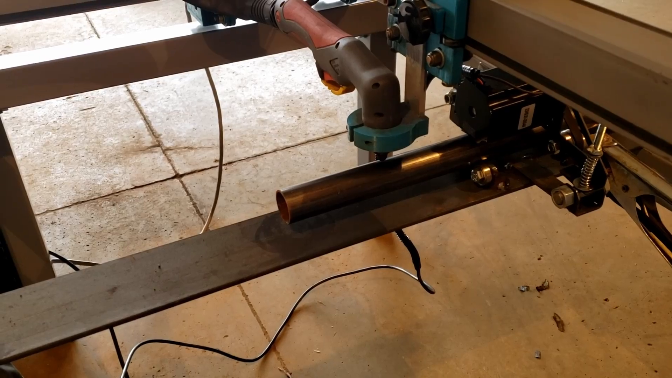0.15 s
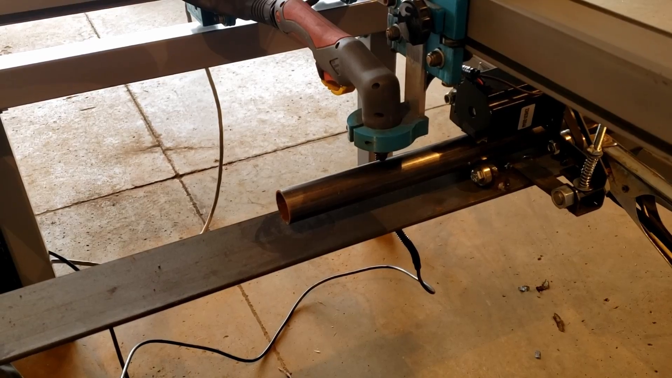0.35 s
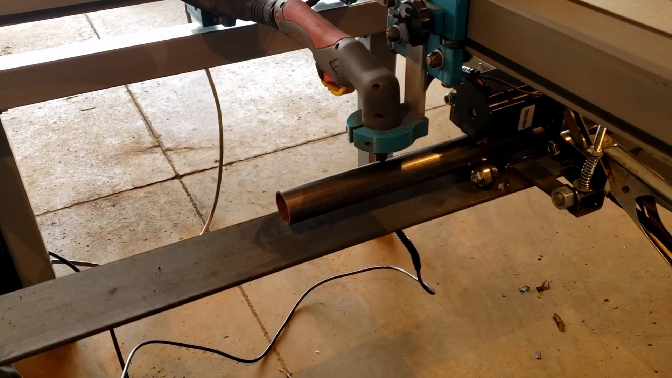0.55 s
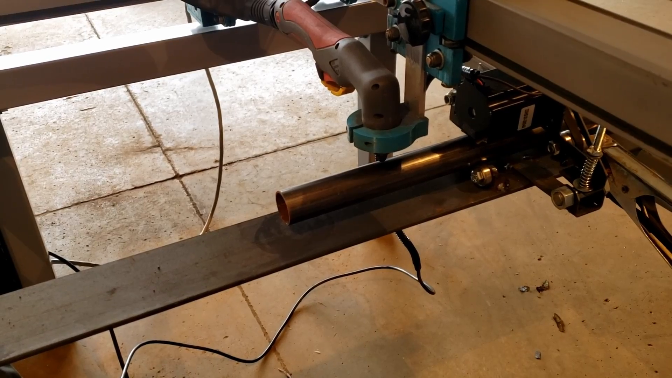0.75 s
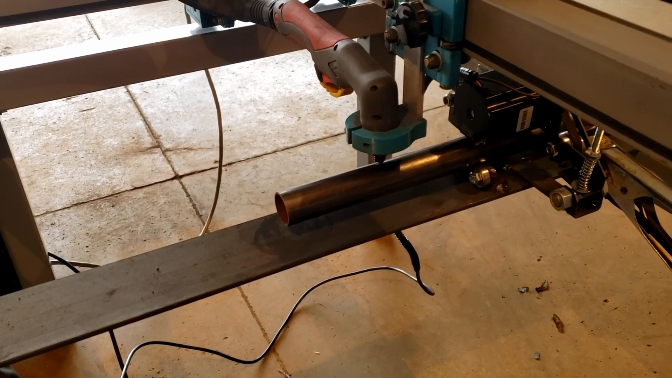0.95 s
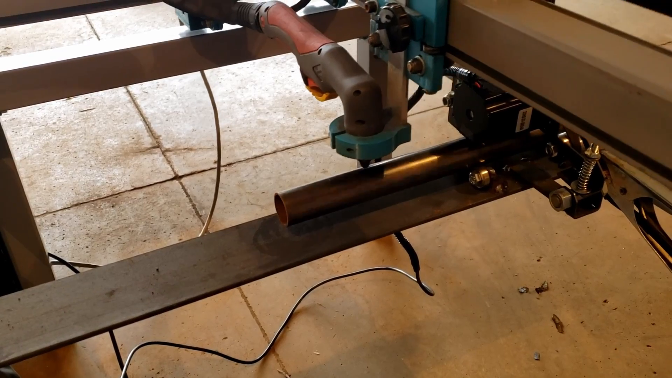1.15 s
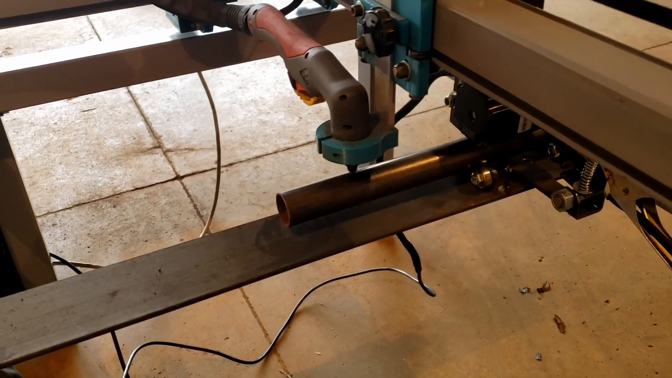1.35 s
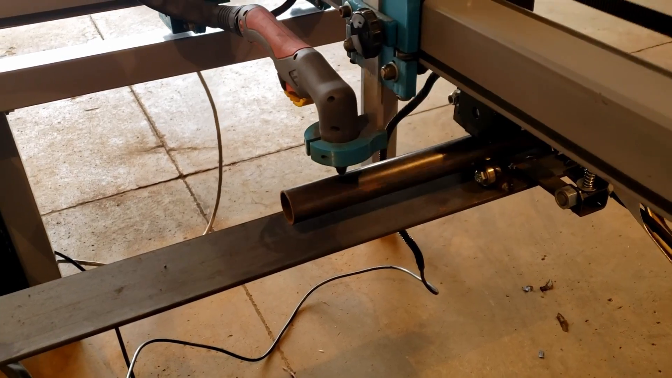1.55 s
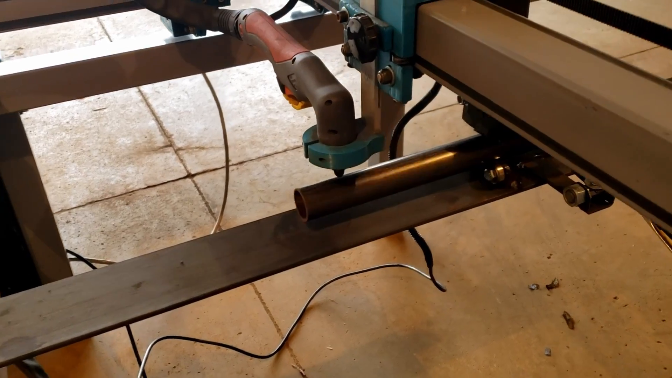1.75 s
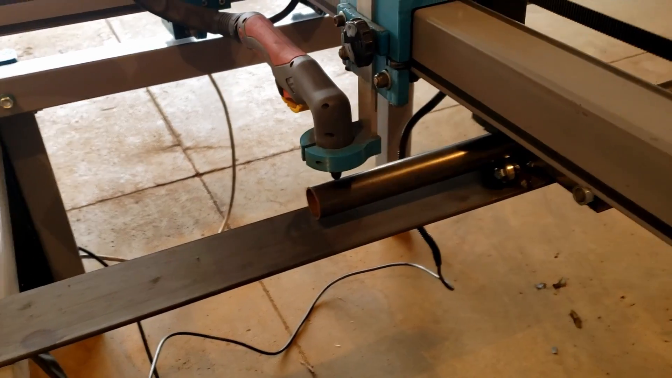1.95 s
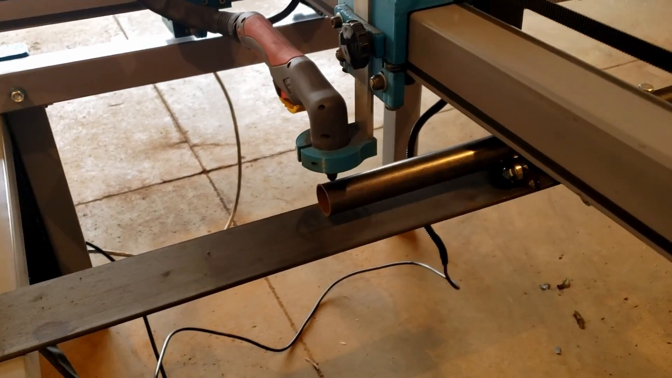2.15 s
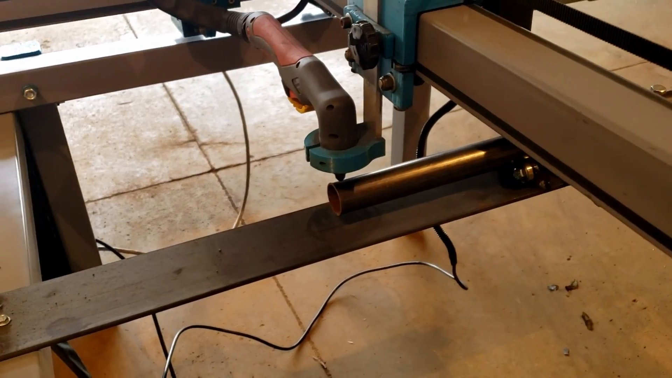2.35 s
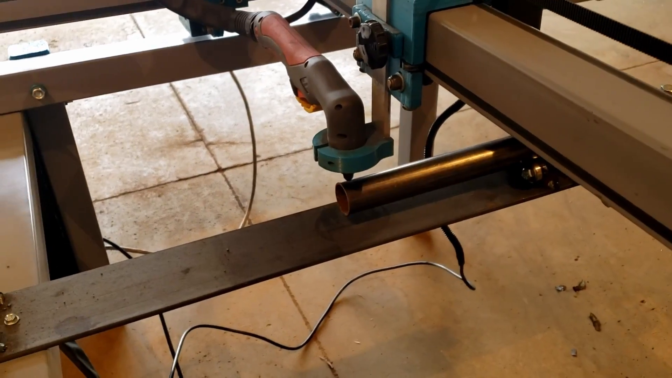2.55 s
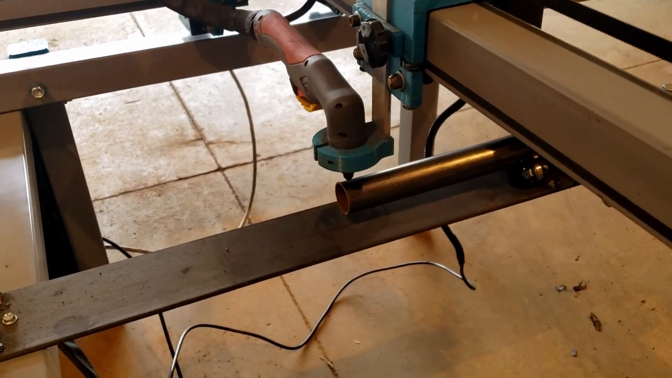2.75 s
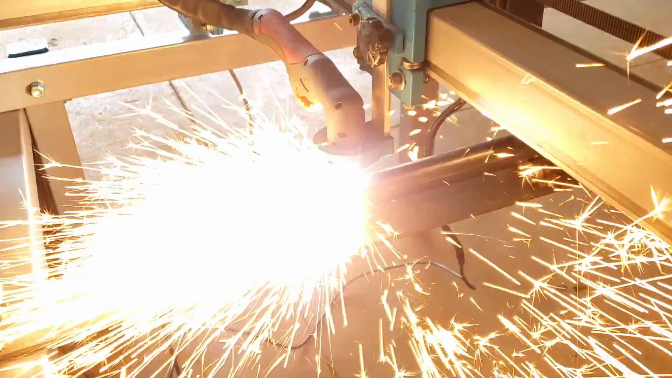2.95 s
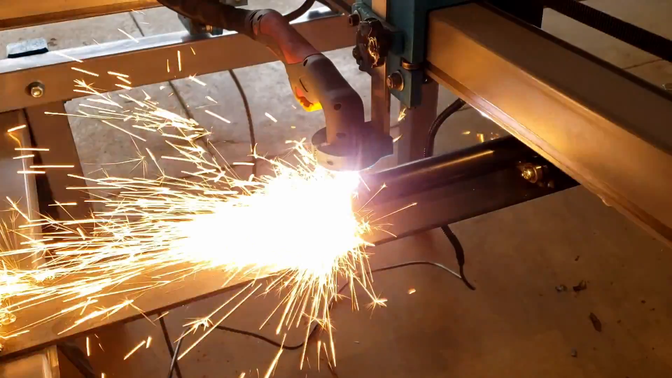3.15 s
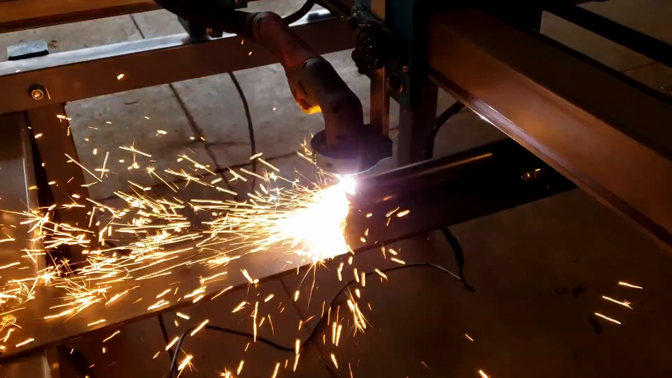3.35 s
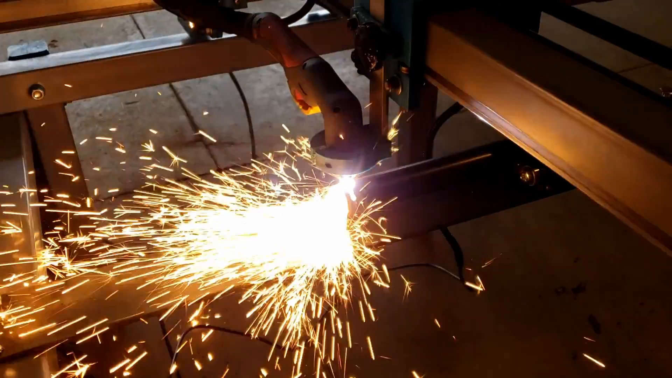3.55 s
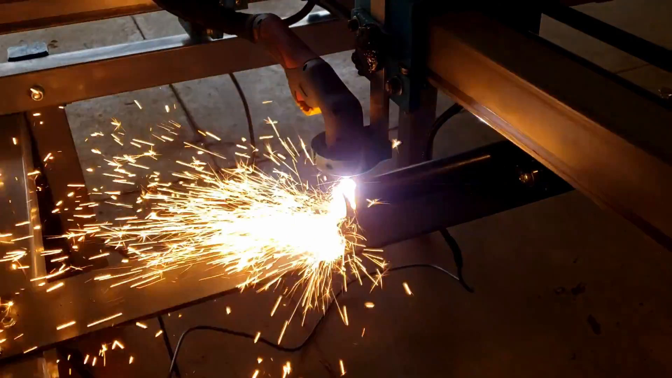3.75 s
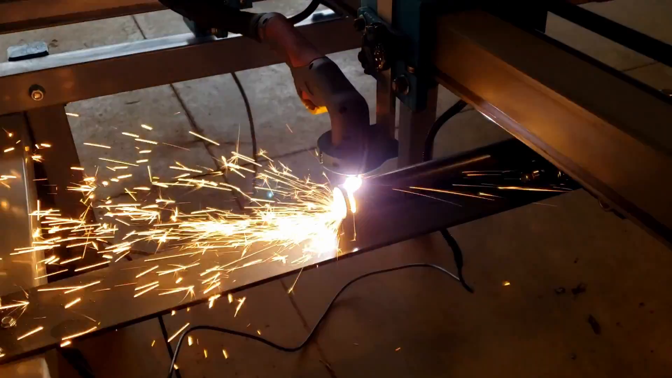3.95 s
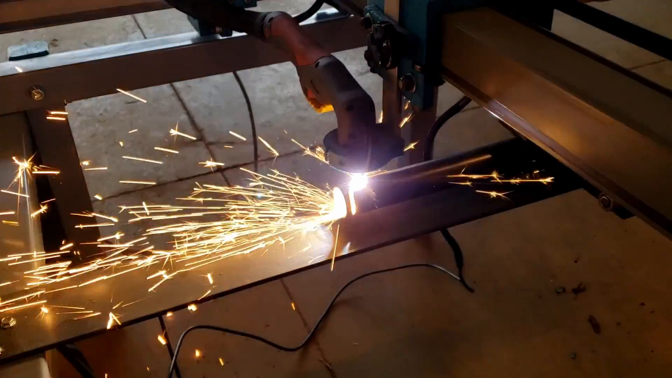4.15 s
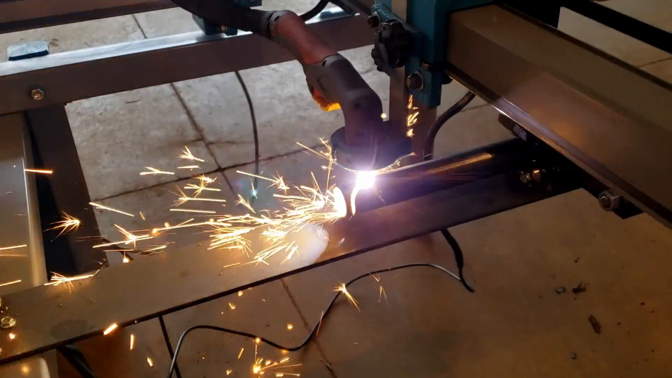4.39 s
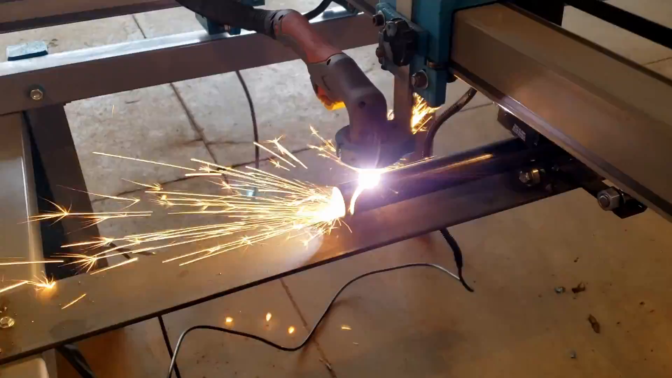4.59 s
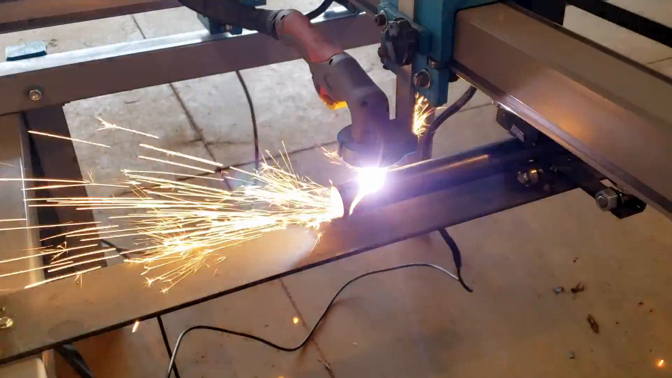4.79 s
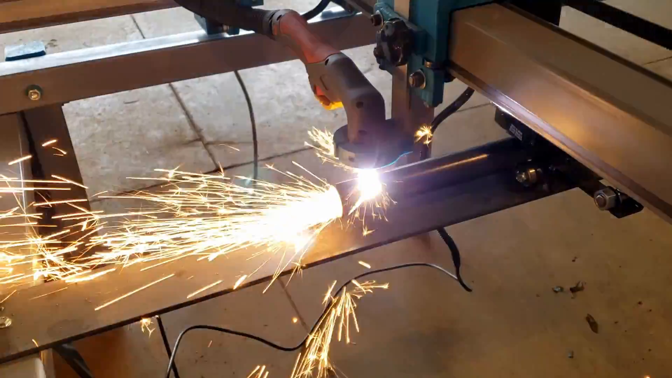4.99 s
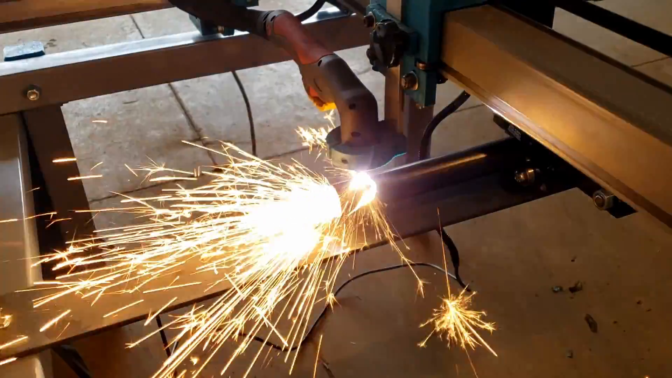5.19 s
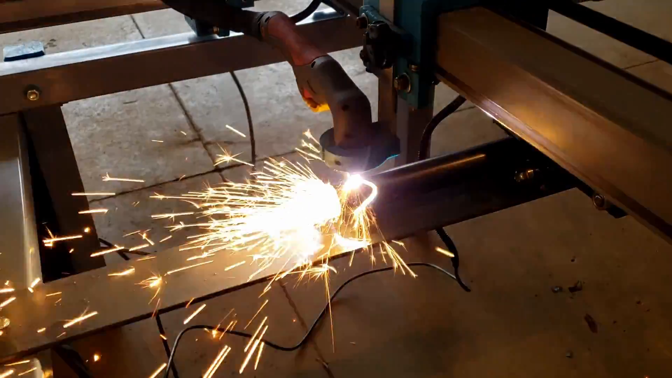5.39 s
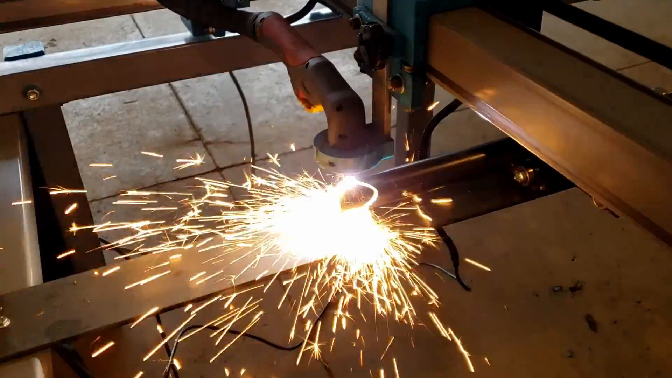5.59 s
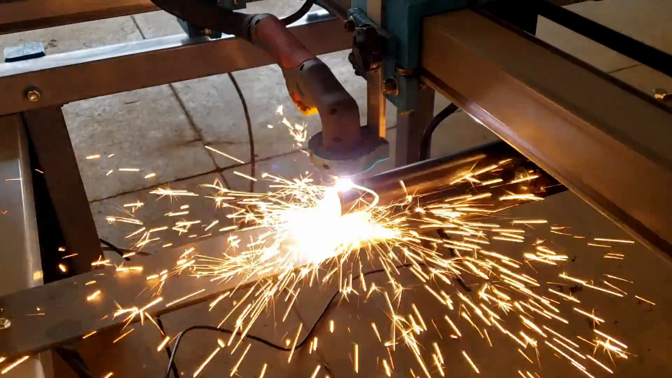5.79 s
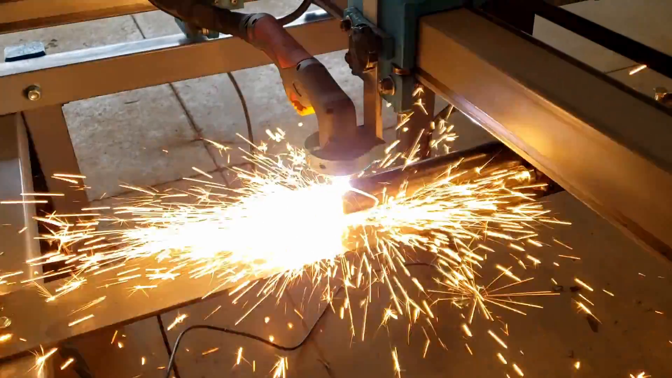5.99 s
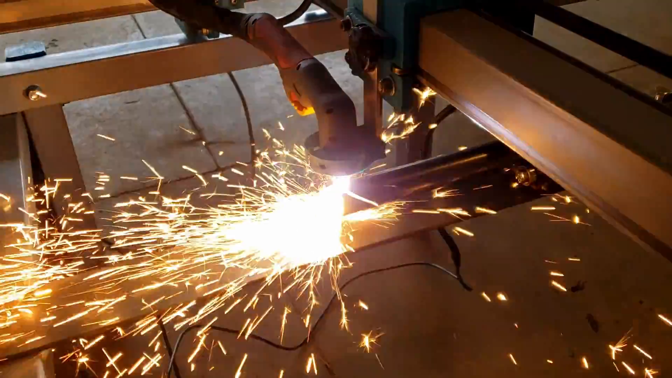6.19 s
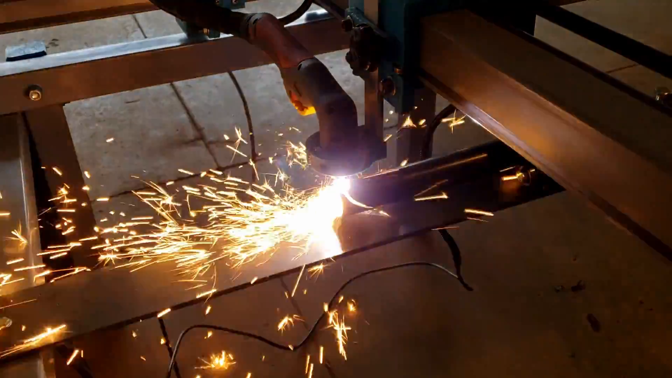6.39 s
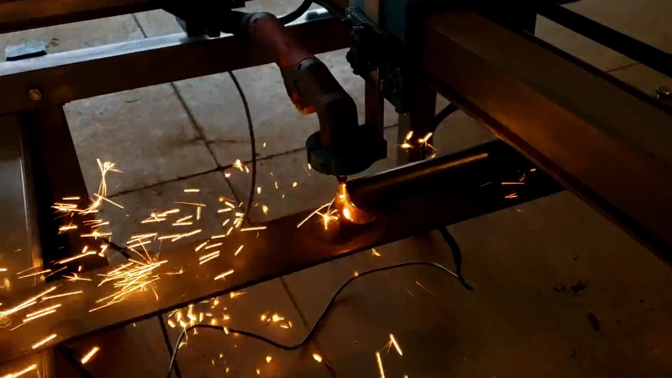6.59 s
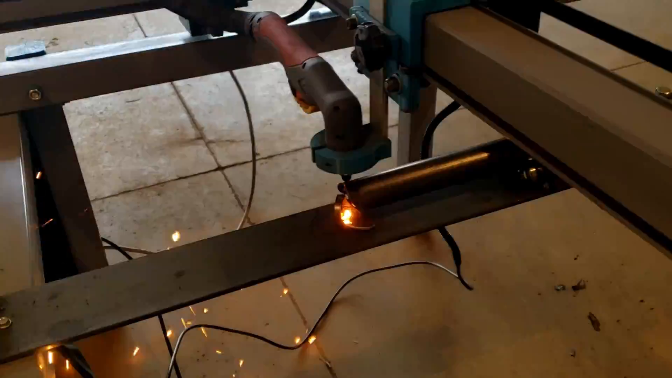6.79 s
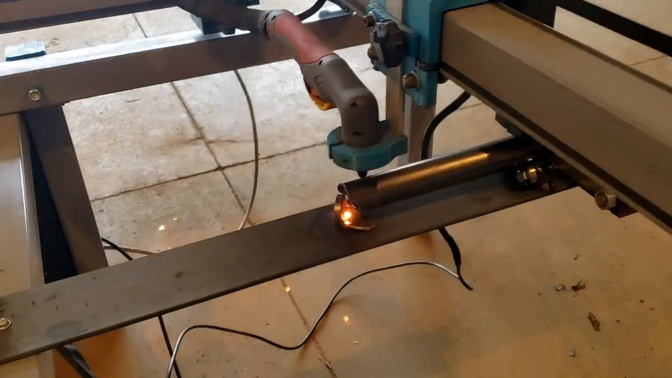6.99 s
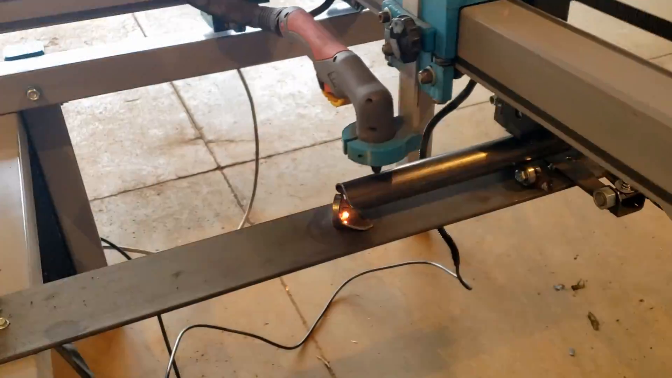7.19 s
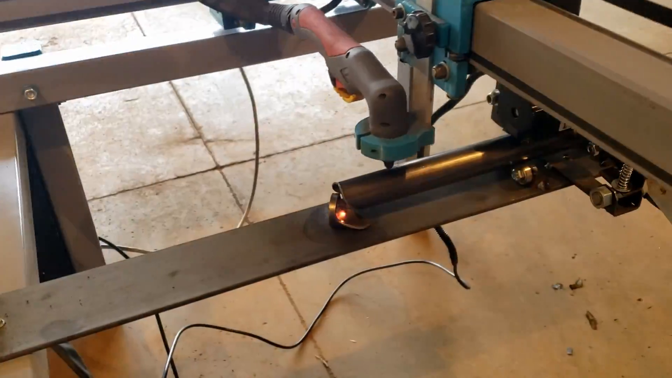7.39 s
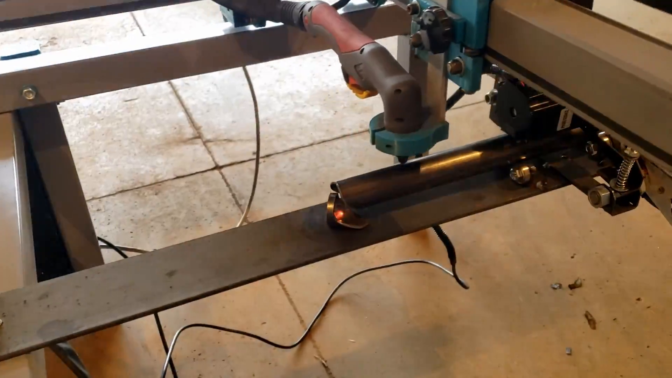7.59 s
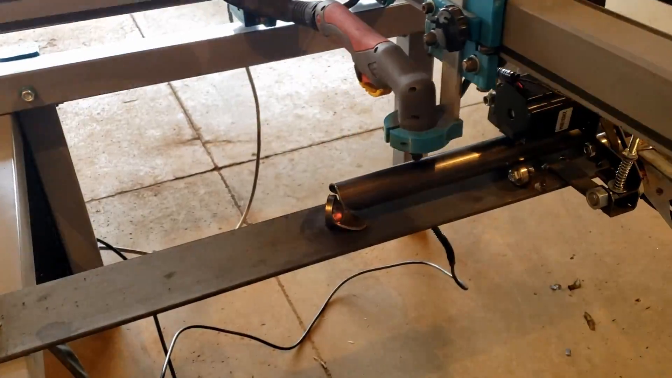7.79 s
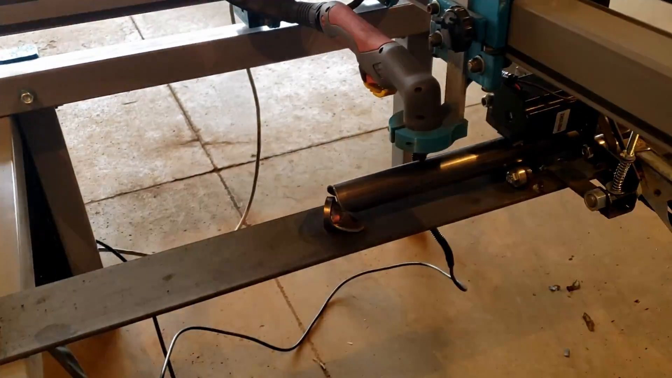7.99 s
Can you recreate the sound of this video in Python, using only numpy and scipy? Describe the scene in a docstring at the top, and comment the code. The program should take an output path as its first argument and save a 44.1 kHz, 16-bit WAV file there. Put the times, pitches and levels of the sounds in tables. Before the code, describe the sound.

Workshop rumble, stepper motors whine and stop, then a plasma torch pops alight, roars and crackles through steel tube, snapping off into hissing air.

```python
"""A low rumble and thin hiss fill a workshop, then stepper motors whine as a gantry carries a plasma torch to a steel tube.
Air spurts from the valve, the arc strikes with pops, and the jet hisses and crackles while the tube's hollow ring sinks and rises.
A faint whistle climbs through the cut; the arc snaps off and cooling air flows on, sharper as the torch backs away.
Motors and whistle are wavering sines, frame rings are decaying sines with rattle, and rumble, air and jet are coloured noise.
The torch gets early reflections, torch and frame get the room's tail, and two unlike microphone ports hear it all."""
import sys
import numpy as np
from scipy import signal
from scipy.fft import rfft, irfft, next_fast_len
from scipy.io import wavfile
from scipy.ndimage import map_coordinates

SR = 44100
rng = np.random.default_rng(int(sys.argv[2]) if len(sys.argv) > 2 else 0)


def store_pcm(level_fs):
    """Save levels as 16-bit WAV."""
    pcm = np.round(np.clip(level_fs, -1, 1) * 32767).astype(np.int16)
    wavfile.write(sys.argv[1], SR, np.atleast_2d(pcm).T)


N = 354563
TIME = np.arange(N) / SR  # s

# Lowest air resonance of the turning tube: t/s, f/Hz
TUBE_RESONANCE = [(3.1, 565), (3.3, 490), (3.55, 500), (3.8, 556), (4.05, 545), (4.35, 478), (4.63, 405),
                  (4.8, 392), (4.98, 410), (5.12, 466), (5.4, 492), (6.6, 470)]
RING_HZ = 480  # the resonance at which the ring has its plain level
DRIVE_S, VALVE_S, ARC_S, OFF_S = 0.975, 2.8005, 2.836, 6.632  # axes start, air opens, arc strikes, arc ends


def amp(db):
    """Decibels to gain."""
    return 10 ** (np.asarray(db) / 20)


def unit(x):
    """Scale to rms 1."""
    return x / np.sqrt(np.mean(x ** 2) + 1e-20)


def along(points, hz):
    """Values of (f/Hz, value) points, read on a log frequency axis."""
    f, v = np.transpose(points)
    return np.interp(np.log(hz + 1), np.log(f + 1), v)


def curves(rows):
    """One value per sample for each column after the time."""
    s, *cols = np.transpose(rows)
    return [np.interp(TIME, s, c) for c in cols]


def ramp(start, length):
    """Rises evenly from 0 to 1."""
    return np.clip((TIME - start) / length, 0, 1)


def swell(centre, half_length):
    """A smooth rise to 1 and fall."""
    return np.exp(-((TIME - centre) / half_length) ** 2)


def gate(start, stop, rise, t60):
    """Opens at start, dies away after stop."""
    return ramp(start, rise) * amp(-60 * np.maximum(TIME - stop, 0) / t60)


def wobble(rate):
    """A smooth random curve, rate knots a second."""
    return map_coordinates(rng.standard_normal(int(N * rate / SR) + 4), [np.arange(N) * rate / SR])


def filtered(x, response):
    """Shapes the spectrum of x by a response of frequency."""
    m = next_fast_len(N + SR // 2)
    return irfft(rfft(x, m) * response(np.fft.rfftfreq(m, 1 / SR)), m)[..., :N]


def spread(pair, colour):
    """Two unrelated signals become a coloured left and right, most alike in the bass."""
    # Likeness of left and right: f/Hz, correlation (1 = same)
    likeness = [(60, .93), (130, 1), (280, 0.76), (700, 0.62), (1500, 0.19), (3000, 0.52), (6000, 0.093),
                (15000, 0.31)]

    def mid_side(hz):
        turn = np.arccos(np.clip(along(likeness, hz), -1, 1)) / 2
        return colour(hz) * np.array([np.cos(turn), np.sin(turn)])
    mid, side = filtered(pair, mid_side)
    return np.array([mid + side, mid - side])


def rush(spectrum, flutter_db=0, grain=1):
    """Turbulent stereo noise of rms 1; it falls off steeply below its lowest point."""
    flutter = amp(flutter_db * (wobble(45) + wobble(300)))
    pair = rng.standard_normal((2, N)) * grain * flutter

    def colour(hz):
        return amp(along(spectrum, hz)) * np.minimum(hz / spectrum[0][0], 1) ** 4
    return unit(spread(pair, colour))


def tone(hz, waver):
    """A sine line whose phase wanders separately at each port."""
    wander = waver * np.array([wobble(7.14), wobble(3.9)])
    return np.sqrt(2) * np.sin(2 * np.pi * hz * TIME + wander)


def shop():
    """Noise rumble and hiss with wavering hum lines rise as the axes move and sink as the torch starts."""
    # Low rumble of the shop: f/Hz, relative level/dB per Hz
    rumble_colour = [(25, -32), (52, -4.5), (78, 1), (110, -8), (150, -19), (195, -11), (290, -27),
                     (400, -29.5), (800, -33.5), (1180, -27), (1550, -39.5), (2200, -63), (4000, -80)]
    # Thin hiss of the shop: f/Hz, relative level/dB per Hz
    hiss_colour = [(1500, -17.5), (2400, -16), (2800, -11), (3250, -4), (4100, -3.5), (5600, -7),
                   (7100, -3), (8200, -17), (9800, -5), (12000, -3.5), (14300, -1.5), (15700, -7.5)]
    # Steady machine tones: f/Hz, level/dB, start t/s
    hum_lines = [(75.4, -60, -1), (187, -65.5, -1), (464, -69.5, 0.47), (1165, -74, -1)]
    park_s = 2.755  # the hiss settles again here
    driving = ramp(DRIVE_S, 0.028)
    rumble_db = -49.5 + 5.5 * driving + 0.86 * wobble(11)
    hiss_db = -53.5 + 5.5 * (driving - ramp(park_s, 0.008))
    hum = sum(amp(db + 1.0 * wobble(9.3)) * tone(hz, waver=1.17) * ramp(s, .05)
              for hz, db, s in hum_lines)
    low = amp(rumble_db) * rush(rumble_colour, flutter_db=.5) + hum
    lingering = amp(-10) * gate(2.8, 2.57, .02, 2.0)
    creeping_back = amp(-35.5 + 9 * ramp(OFF_S, 1.48))  # up 9 dB after the cut
    sink = gate(-1, 2.762, .01, 0.19) + lingering + creeping_back
    return low * sink + amp(hiss_db) * rush(hiss_colour) * gate(-1, VALVE_S, .01, .2)


def gantry():
    """Steppers sing at whole multiples of their step rate, trading strength over a drone and rolling noise."""
    # Stepper whine: step-rate multiple (rounded for pitch), level/dB as travel begins, level/dB as it ends
    whine_lines = [(8, -54, -52), (20, -69, -73), (24, -61, -52), (31, -68, -63), (32, -52, -56.5),
                   (34, -48, -57), (36, -61, -60), (60, -58, -70), (61, -65, -64), (63.3, -55.5, -60),
                   (65.5, -72, -70), (68.8, -65, -75), (69, -66, -66), (109, -59, -66), (138, -67, -68),
                   (143, -69, -65)]
    # Drone of the drive train: f/Hz, level/dB
    drone_lines = [(186.5, -57), (280, -61.5), (417, -65.5), (566, -66.5), (752, -63)]
    # Carriage rolling: f/Hz, relative level/dB per Hz
    rolling_colour = [(71, -33), (120, -2.5), (627, -13.5), (835, -8.5), (906, -14), (2320, -20.5),
                      (2510, -16), (2730, -23.5), (3420, -16), (5350, -19.5), (6700, -16.5), (8390, -32),
                      (14000, -22), (15800, -19)]
    step_hz = 104.15
    way = np.clip((TIME - 1) / 1.34, 0, 1) ** 1.05  # share of the travel done
    whine = sum(amp(first + (last - first) * way + 1.2 * wobble(8.28))
                * tone(round(k) * step_hz, waver=0.013 * k) for k, first, last in whine_lines)
    drone = sum(amp(db + 1.6 * wobble(7.8)) * tone(hz, waver=.5) for hz, db in drone_lines)
    steps = 1 + 0.099 * np.cos(4 * np.pi * step_hz * TIME)  # pulses at twice the step rate
    rolling_db = -47 + 7 * swell(2.27, 0.024)  # a shudder on braking
    rolling = amp(rolling_db) * rush(rolling_colour, flutter_db=1.0, grain=steps)
    return (whine + drone) * gate(0.95, 2.26, 0.13, .15) + rolling * gate(DRIVE_S, 2.33, 0.01, 0.68)


def judder(t60, rattle):
    """A frame resonance sings while the motor speed passes through it, and loose parts rattle along."""
    # Frame resonances as the motors start and brake: t/s, level/dB, f/Hz, length before decay/s
    resonances = [(1.006, -55, 2010, 0.054), (1.013, -46, 3330, 0.032), (2.233, -46, 5760, 0.017),
                  (2.245, -44, 2117, 0.018), (2.263, -39, 1280, 0.016), (2.267, -47, 7250, 0.014),
                  (2.268, -46, 6100, 0.013), (2.277, -47, 2160, .015), (2.28, -52, 830, 0.0046)]
    out = np.zeros((2, N + SR))
    t = np.arange(SR // 4) / SR
    for s, db, hz, length in resonances:
        ring = np.sin(2 * np.pi * hz * t + rng.normal(0, 0.42, (2, 1)))
        ring += rattle * rng.standard_normal((2, len(t)))
        envelope = (1 - np.exp(-t / 0.00065)) * amp(db - 60 * np.maximum(t - length, 0) / t60)
        out[:, round(s * SR):][:, :len(t)] += envelope * ring
    return out[:, :N]


def lift(turns, rise_hz):
    """The lead screw lowers the torch at some turns a second, with one faint rising scrape a turn."""
    start_s = 2.33
    turn = ((TIME - start_s) * turns) % 1
    hz = 3650 + rise_hz * turn + 110 * np.array([wobble(500), wobble(500)])
    scrape = np.sin(2 * np.pi * np.cumsum(hz, axis=1) / SR) * np.exp(-((turn - .33) / .2) ** 2)
    return amp(-52.0) * scrape * gate(start_s, 2.72, .01, .05)


def air():
    """Turbulent air without arc: a spurt from the valve, then cooling flow that sharpens as the torch backs away."""
    # Spurt from the valve: f/Hz, relative level/dB per Hz
    spurt_colour = [(120, 5), (1000, -11.5), (3400, -4.5), (4000, 4), (5200, 2), (6500, -11), (8600, -22),
                    (10000, -1), (13000, 2), (15500, -4.5)]
    # Cooling flow: f/Hz, relative level/dB per Hz
    flow_colour = [(50, -37), (140, -33), (180, -14.5), (330, -22), (450, -12), (520, -21), (1300, -20.5),
                   (2600, -15.5), (3600, -15), (4700, -9.5), (6200, -12.5), (7100, -9), (8600, -19.5),
                   (12000, -6.5), (15600, -1.5)]
    # Sharp edge of the nozzle: f/Hz, relative level/dB per Hz
    nozzle_colour = [(8500, -30), (10200, -11.5), (11400, -2.5), (12600, -12), (14500, -10.5)]
    away = ramp(7.51, 0.41)  # the torch backs away along the tube
    purge = np.exp(-np.maximum(TIME - OFF_S, 0) / 0.18)  # the flow overshoots as the arc dies, and settles
    air_db = -39.5 + 8.5 * purge + 4 * away ** 2
    nozzle_db = -49 + 10.5 * away
    flow = amp(air_db) * rush(flow_colour, flutter_db=0.5)
    cooling = flow + amp(nozzle_db) * rush(nozzle_colour)
    spurt = amp(-29) * rush(spurt_colour, flutter_db=3.5)
    return cooling * gate(OFF_S - .02, 9, 0.064, .1) + spurt * gate(VALVE_S, ARC_S, 0.0035, 0.14)


def pops():
    """Decaying bursts of band noise: valve and arc pops, low thumps during and at the end of the cut, and a
    bright burst just before the arc ends."""
    # Valve and arc pops, then low thumps, pops and one bright burst late in the cut: t/s, level/dB, centre
    # f/Hz, width/octaves, t60/s
    bursts = [(2.8007, -22, 5000, 0.8, 0.0086), (2.8195, -27, 800, 3.4, 0.018), (2.839, -24, 700, 4, 0.03),
              (2.847, -30, 1500, 6, 0.0077), (5.93, -47.5, 500, 1.6, 0.84), (5.936, -45, 55, 1.4, 0.33),
              (6.599, -26.5, 10300, 1, .1), (6.612, -36, 60, 1.1, 0.14), (6.631, -32.5, 700, 1.7, 0.035)]
    out = np.zeros((2, N))
    length = SR // 2
    for s, db, hz, octaves, t60 in bursts:
        edge = 2 ** (octaves / 2)
        band = signal.butter(1, [hz / edge, min(hz * edge, SR * .45)], "band", fs=SR)
        burst = unit(signal.lfilter(*band, rng.standard_normal((2, length))))
        out[:, round(s * SR):][:, :length] += burst * amp(db - 60 * np.arange(length) / SR / t60)
    return spread(out, np.ones_like)


def spatter(rate, size, life):
    """Gain of a flow broken by tiny bursts of molten metal: random hits a second, each dying away over its life."""
    hits = (rng.random(N) < rate / SR) * rng.exponential(size, N)
    return 1 + signal.lfilter([1], [1, -np.exp(-1 / (life * SR))], hits)


def hollow(width_hz, flutter_db):
    """The jet blows across the tube's air resonances, which shift as it turns and are stronger the lower they sink."""
    # The tube's air resonances: multiple of the lowest, relative level/dB
    overtones = [(1, -10), (2, -2.5), (3, 1), (4, 2), (5, -5), (6, -3), (7, -5), (8, -7), (9, -9), (10, -7)]
    lowest_hz, = curves(TUBE_RESONANCE)
    ring_db = -50 - 15 * np.log2(lowest_hz / RING_HZ)  # 15 dB weaker per octave up
    phase = 2 * np.pi * np.cumsum(lowest_hz) / SR
    band = signal.butter(2, width_hz / 2, fs=SR, output="sos")
    ring = np.zeros((2, N))
    for k, db in overtones:
        a, b = signal.sosfilt(band, rng.standard_normal((2, 2, N)))
        narrow = a * np.cos(round(k) * phase) + b * np.sin(round(k) * phase)
        ring += amp(db + flutter_db * wobble(25)) * narrow
    return amp(ring_db) * unit(spread(ring, np.ones_like))


def cutting():
    """The lit jet: noise roar, crackling hiss and flare follow its bite; sparks spray under a very high sizzle."""
    # How hard the jet bites into the steel: t/s, level/dB
    bite = [(2.97, -40.5), (3.24, -41), (3.37, -46), (3.44, -43), (3.75, -45.5), (5.52, -44.5),
            (5.75, -42.5), (5.82, -43), (6.08, -39), (6.44, -38), (6.59, -39), (6.6, -36)]
    # Brief flare-ups of the jet: t/s, rise/dB, half length/s
    flare_ups = [(3.145, 5, 0.036), (4.06, 1.5, .12), (5.066, 6, .09), (5.62, 2.5, 0.044), (6.458, 1, .08)]
    # Strength of the very high sizzle: t/s, level/dB
    sizzle_level = [(2.97, -27.5), (3.11, -23.5), (3.28, -29.5), (3.58, -32.5), (4.02, -25), (4.9, -28),
                    (5.45, -30.5), (5.65, -26.5), (5.85, -31), (6.35, -29.5), (6.6, -26)]
    # Sheets of sparks spraying off the rail: start t/s, level/dB, rise/s, fading/dB per s
    spark_sheets = [(2.86, -42.5, 0.068, 22), (5.48, -42, 0.14, 11)]
    # Colours of the jet's roar, hiss, flare and sizzle: f/Hz, relative level/dB per Hz
    roar_colour = [(35, -30), (60, -24), (294, -9.5), (422, -6), (651, -4.5), (952, -2), (1080, -4),
                   (1440, -1), (3620, -3), (4500, -4.5), (5850, -41), (9900, -120)]
    hiss_colour = [(2500, -12), (3800, -7.5), (4900, 0), (6000, -1), (7200, 2.5), (8200, -6.5),
                   (9500, -3.5), (10700, -1.5), (11900, -6.5), (14000, -27)]
    flare_colour = [(9500, -18), (11000, -8), (11900, 1), (13000, 1), (14200, 3), (15800, -5.5)]
    sizzle_colour = [(12500, -20), (13800, -14), (14500, -3.5), (15200, 6.5), (15700, -2), (16000, -8.5)]
    # Colours of the spark spray, pilot flame and stirred air: f/Hz, relative level/dB per Hz
    spray_colour = [(1800, -6), (2600, -1), (3300, -10), (4000, 1), (5000, 1.5), (6500, -7), (9000, -38)]
    pilot_colour = [(3400, -25), (4000, -14), (4600, 3), (5600, -16), (7200, 3), (8500, -13), (10500, -2),
                    (12000, 11), (15800, -5)]
    draught_colour = [(35, -8), (70, 0), (150, -3), (300, -4), (600, -33)]

    bite_db = curves(bite)[0] + 43  # relative to the usual bite of -43 dB
    free = gate(ARC_S, 2.952, 0.0076, .012)  # the free flame is louder until it pierces the wall
    sunk = np.maximum(RING_HZ - curves(TUBE_RESONANCE)[0], 0)
    # the plain roar gives way by up to 5 dB as the ring sinks
    roar_db = -46 + 0.82 * bite_db - 5 * sunk / sunk.max()
    hiss_db = -41 + 1.09 * bite_db + 5 * free
    surge_db = sum(db * swell(s, half_length) for s, db, half_length in flare_ups)
    flare_db = -34.5 + bite_db + surge_db + 9.5 * free + .7 * wobble(16)
    sizzle_db = curves(sizzle_level)[0] + 1.1 * wobble(16)

    sparks = spatter(rate=70, size=.6, life=0.00053)
    ring = hollow(width_hz=90, flutter_db=2)
    roar = amp(roar_db) * rush(roar_colour, flutter_db=0.83, grain=sparks) + ring
    hiss = amp(hiss_db) * rush(hiss_colour, flutter_db=0.8, grain=sparks)
    sheets = sum(ramp(s, rise) * amp(db - fade * np.maximum(TIME - s - rise, 0))
                 for s, db, rise, fade in spark_sheets)
    spray = sheets * rush(spray_colour, grain=sparks)
    flare = amp(flare_db) * rush(flare_colour, flutter_db=1.2)
    sizzle = amp(sizzle_db) * rush(sizzle_colour, flutter_db=.6)
    pilot = amp(-27.0) * rush(pilot_colour, flutter_db=0.0) * free
    # stirred air buffets the left port, the right 16 dB less
    draught = amp(-59 + 2.1 * wobble(7.3)) * rush(draught_colour) * amp([[0], [-16]])
    jet = roar + hiss + spray + flare + sizzle + draught
    return jet * gate(ARC_S - .01, OFF_S, 0.011, 0.066) + pilot


def whistle():
    """A breathy edge tone, a sine of jittering pitch, climbs and fades as the cut opens."""
    start_s, from_hz, to_hz, climb_s = 3.28, 10450, 12360, 2.05  # climb_s: time constant
    age = np.maximum(TIME - start_s, 0)
    hz = to_hz + (from_hz - to_hz) * np.exp(-age / climb_s)
    breathy_hz = hz + 55 * np.array([wobble(400), wobble(400)])
    phase = 2 * np.pi * np.cumsum(breathy_hz, axis=1) / SR
    level_db = -47 - 2 * age + 2.5 * wobble(11)  # fades 2 dB per s
    return amp(level_db) * np.sin(phase) * gate(start_s, OFF_S, 0.054, .05)


def reflect(x):
    """The table and gantry near the torch send back weak, delayed copies."""
    # Early reflections: delay left/s, delay right/s, gain
    echoes = [(.0021, 0.0017, -0.012), (.0037, 0.0031, -0.11), (.0059, .0063, 0.076), (.0093, .0088, .16),
              (0.0153, .0149, -0.061)]
    out = x.copy()
    for left, right, gain in echoes:
        for side, delay in enumerate((left, right)):
            out[side] += gain * np.pad(x[side], (round(delay * SR), 0))[:N]
    return out


def workshop(x):
    """The hard floor and walls ring on as decaying noise, longest in the middle and shortest in the high treble."""
    # Decay of the room: f/Hz, t60/s
    decay = [(200, 0.44), (2000, 0.63), (6000, 0.51), (15000, 0.27)]
    hz, t, z = signal.stft(rng.standard_normal((2, SR // 2)), SR, nperseg=256)
    dying = amp(-60 * t / along(decay, hz)[:, None])
    tail = signal.istft(z * dying, SR, nperseg=256)[1]
    late = np.pad(x, ((0, 0), (round(.007 * SR), 0)))  # 7 ms before the tail begins
    return signal.fftconvolve(late, tail / np.linalg.norm(tail[0]), axes=1)[:, :N]


def scene():
    """The shop, the moving gantry and the torch, with the room around torch and frame."""
    torch = amp(-1.25) * reflect(cutting() + air() + pops())
    frame = judder(t60=0.035, rattle=0.52) + lift(turns=9.3, rise_hz=850)
    room = amp(-8.5) * workshop(torch + frame)
    return shop() + gantry() + frame + whistle() + torch + room


def record(dry):
    """Each microphone port has its own colour and phase; nothing is kept above the band limit."""
    # Difference of the ports: f/Hz, left minus right level/dB
    port_balance = [(100, 5.5), (2500, 2.5), (3700, 4.5), (4500, -0.5), (6000, -2), (6800, 24.5),
                    (7700, 8.5), (8600, 18), (9600, 1), (11500, -3), (13000, 4.5), (14200, 9), (15400, 54)]
    # Phase between the ports: f/Hz, lead of the left/radians
    port_phase = [(0, 0), (1810, 0.5), (2330, -1.3), (2760, 0.87), (3100, 0.84), (3790, 1.63), (4310, 0.1),
                  (6200, 4), (6980, 6), (7920, 7), (11100, 10), (13600, 13), (15200, 14), (16500, 18.3)]
    top_hz = 15820

    def ports(hz):
        ratio = amp(along(port_balance, hz))
        lead = np.exp(1j * along(port_phase, hz))
        even_power = np.sqrt(2 / (1 + ratio ** 2))  # keeps the two ports' summed power
        return np.array([ratio * lead, np.ones_like(hz)]) * even_power * (hz < top_hz)
    return filtered(dry, ports)


dry = scene()
out = record(dry)
store_pcm(out)
```